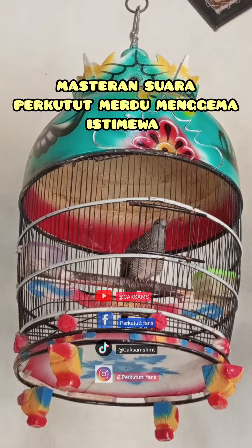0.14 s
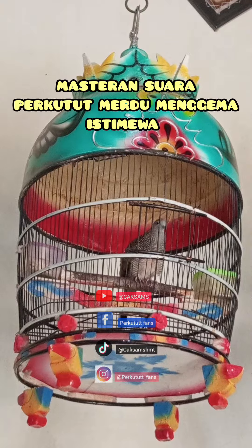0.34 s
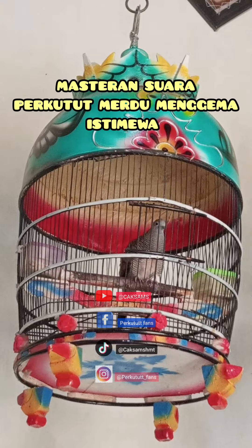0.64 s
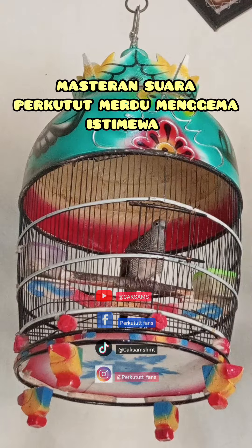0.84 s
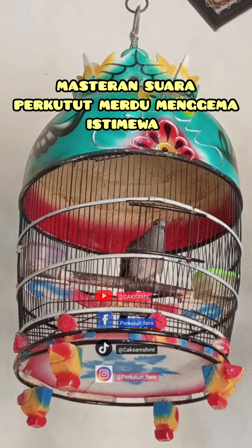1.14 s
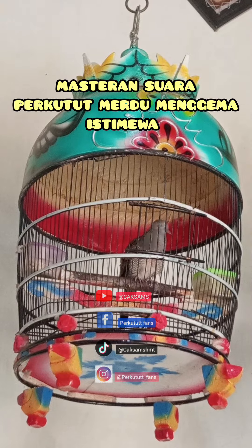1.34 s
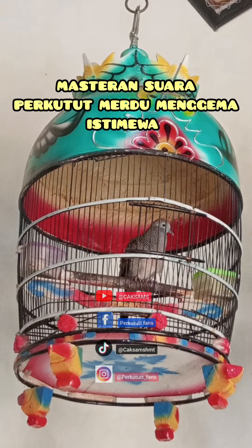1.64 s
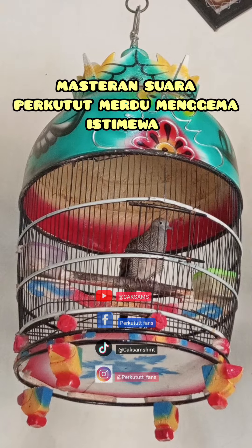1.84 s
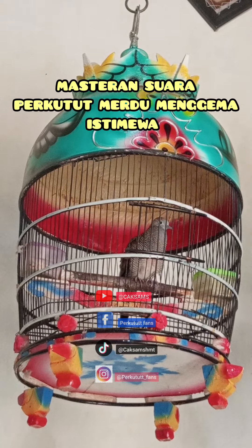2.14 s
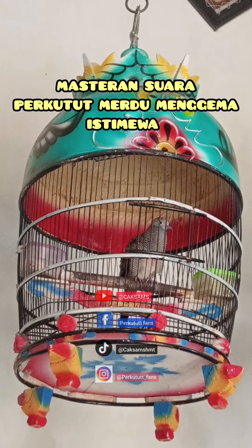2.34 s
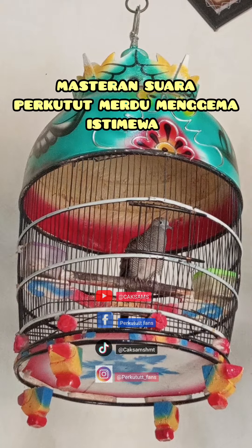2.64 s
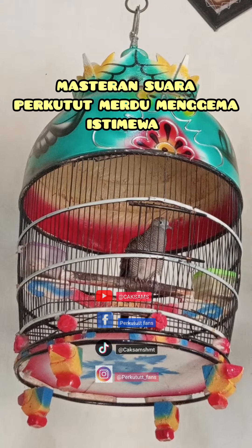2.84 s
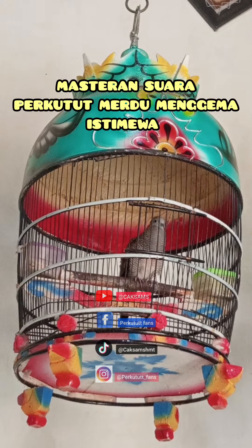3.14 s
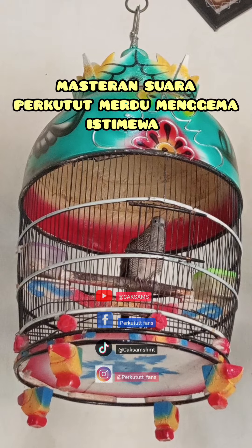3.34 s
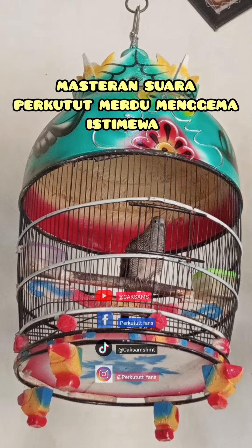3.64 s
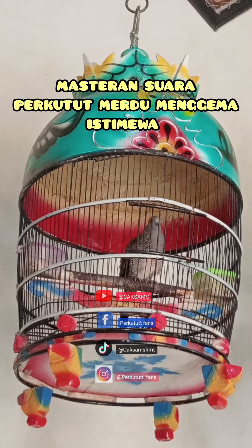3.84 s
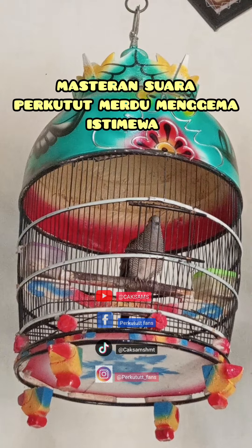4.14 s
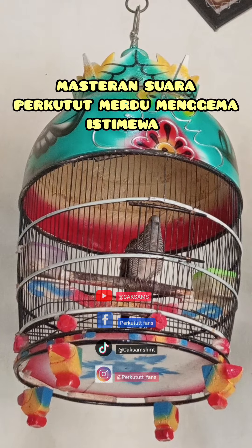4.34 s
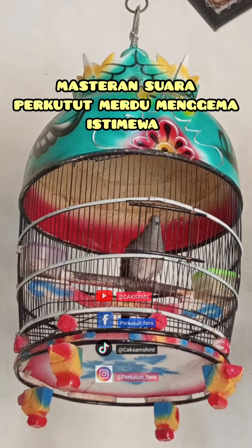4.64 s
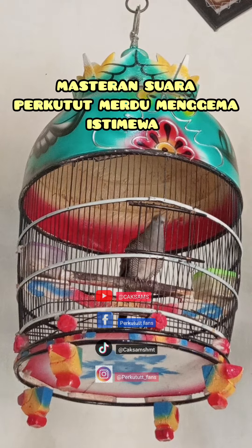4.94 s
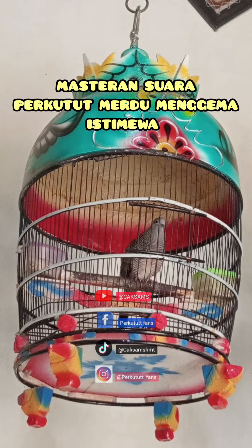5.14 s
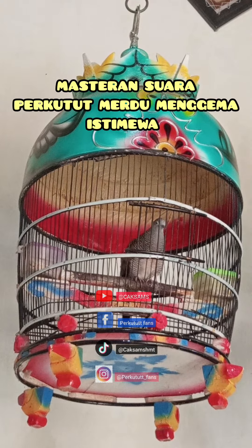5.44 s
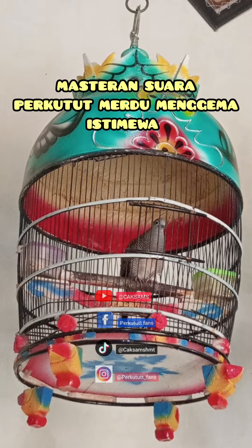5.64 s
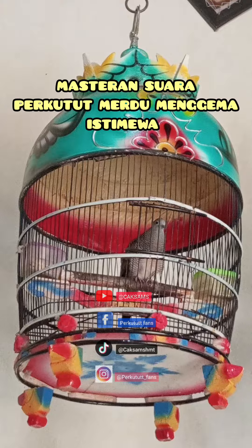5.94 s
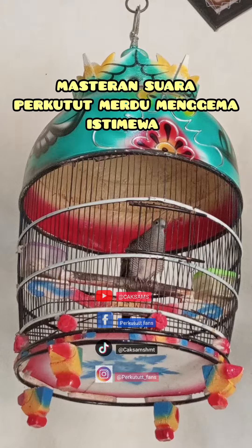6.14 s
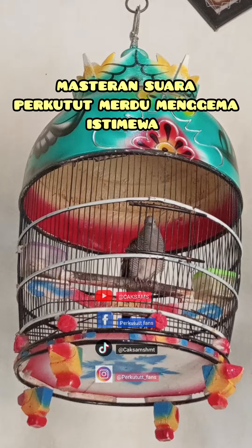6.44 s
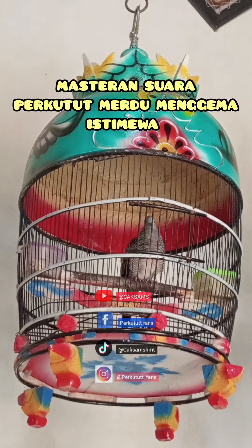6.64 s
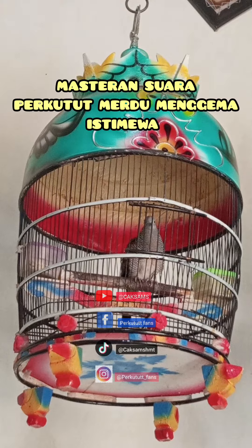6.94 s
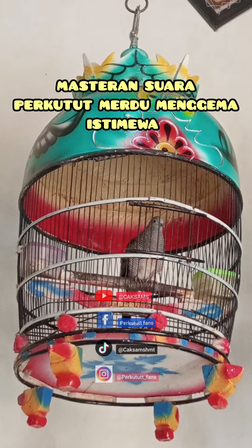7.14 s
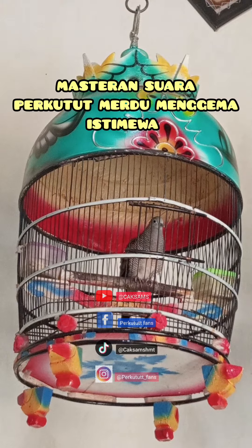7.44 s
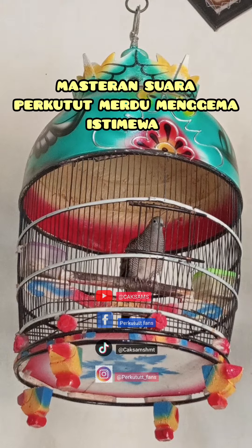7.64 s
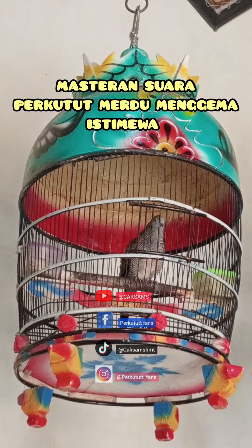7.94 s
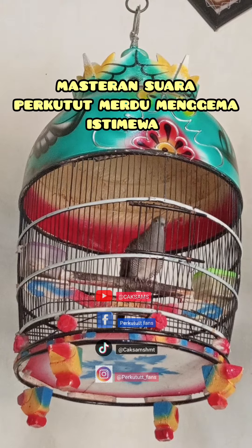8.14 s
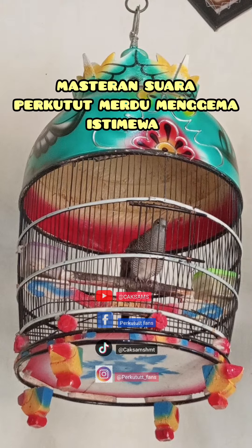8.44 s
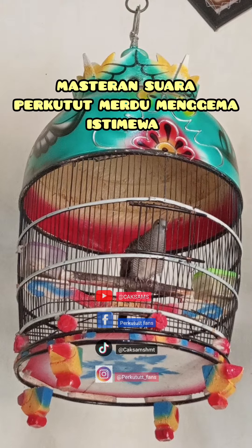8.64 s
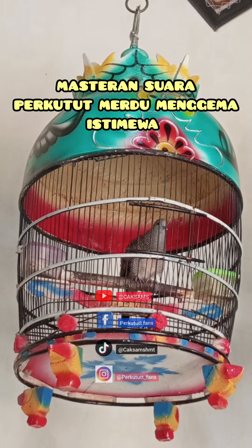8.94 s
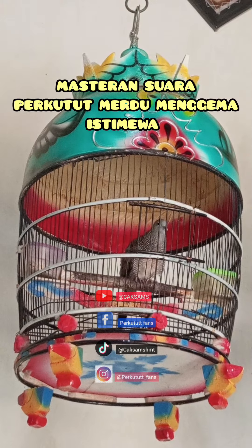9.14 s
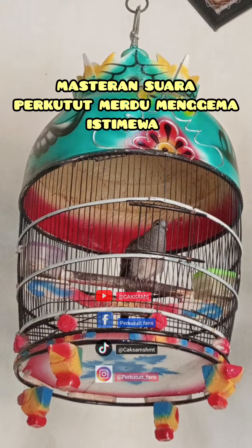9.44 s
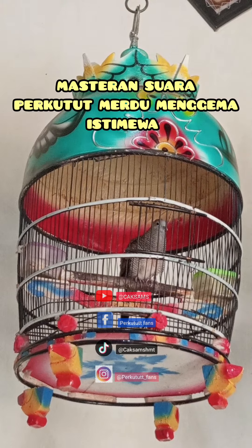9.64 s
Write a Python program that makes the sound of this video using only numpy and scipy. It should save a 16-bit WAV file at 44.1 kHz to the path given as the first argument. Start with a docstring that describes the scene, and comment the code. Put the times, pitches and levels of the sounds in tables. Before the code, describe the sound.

A caged dove sings a loud phrase of quick hoots and coos, echoing in a hard-walled room. In the pause that follows, a single sharp wooden knock sounds nearby. The dove then sings two more phrases with a gap between them. Underneath are a soft hush, a faint distant motor and tiny far-off bird chirps, and a brief rustle comes near the end.

```python
"""A caged dove coos its first phrase, and a hard-walled room answers with strong early echoes.
Under it lie the hush of the house and a distant motor that drones on, slowly losing speed.
Small birds begin to chirp far off, things bump and rustle nearby, and near 3 s a single knock
sets the modes of something wooden ringing. The dove calls again at 5 s and at 8 s;
at the end the motor surges twice and the rustling grows louder."""
import sys
import numpy as np
from scipy import signal
from scipy.fft import rfft, irfft, next_fast_len
from scipy.io import wavfile
from scipy.ndimage import uniform_filter1d, minimum_filter1d, map_coordinates

SR = 44100
rng = np.random.default_rng(int(sys.argv[2]) if len(sys.argv) > 2 else 0)


def inscribe(sig):
    """Save sig as 16-bit PCM at rate SR to the path in sys.argv[1].

    A 1-D sig is mono; a 2-D sig holds one channel per row.
    Samples are clipped to [-1, 1] before scaling.
    """
    pcm = np.round(np.clip(np.atleast_2d(sig).T, -1, 1) * 32767)
    wavfile.write(sys.argv[1], SR, pcm.astype(np.int16))


N = 430857


def amp(db):
    return 10 ** (np.asarray(db) / 20)


def unit_rms(x):
    return x / np.sqrt(np.mean(x ** 2) + 1e-20)


def along(points, hz):
    """Interpolates (Hz, value) points on a logarithmic frequency axis."""
    freqs, values = np.transpose(points)
    return np.interp(np.log(hz + 1), np.log(freqs + 1), values)


def curves(rows, count=N):
    """Interpolates each column after the time to one value per sample."""
    times, *columns = np.transpose(rows)
    return [np.interp(np.arange(count) / SR, times, column) for column in columns]


def wobble(rate):
    """Smooth random modulation with rate knots a second."""
    steps = np.arange(0, N + 64, 64)
    return np.interp(np.arange(N), steps, map_coordinates(rng.standard_normal(600), [steps * rate / SR]))


def phase_of(hz):
    """Phase is the time integral of frequency."""
    return 2 * np.pi * np.cumsum(hz) / SR


def filtered(x, response):
    """Linear filtering: the spectrum of x times a frequency response."""
    size = next_fast_len(len(x) + 8192)
    return irfft(rfft(x, size) * response(np.fft.rfftfreq(size, 1 / SR)), size)[:len(x)]


def band(x, centre_hz, octaves):
    """A Gaussian passband in log frequency, with output at unit RMS."""
    return unit_rms(filtered(x, lambda hz: np.exp(-.5 * (np.log2((hz + 1) / centre_hz) / octaves) ** 2)))


def add(track, start_s, x):
    """Superposes x on track from start_s."""
    part = track[round(start_s * SR):][:len(x)]
    part += x[:len(part)]


# Patchiness of the hush. Each row: frequency in Hz, standard deviation of the level in dB.
HUSH_SPREAD = [(100, 4), (500, 3), (1500, 1.5), (4000, 1)]
# Its spectrum. Each row: frequency in Hz, relative spectral density in dB.
HUSH_SPECTRUM = [(25, -31.5), (50, -15), (110, -1.5), (170, -6.5), (300, -9), (500, -12.5), (680, -14.5),
                 (1000, -9.5), (1300, -19.5), (2500, -20.5), (5000, -22), (6800, -20.5), (8500, -32.5),
                 (10000, -42.5), (15500, -41.5)]
# Its slow drift. Each row: time in seconds, level of the treble band in dB.
HUSH_LEVEL = [(0.0, -75), (0.76, -75.5), (0.92, -73), (2.1, -75.5), (3.83, -73), (4.22, -76), (4.95, -74),
              (5.05, -75), (5.8, -75.5), (6, -74), (8.7, -72), (9.77, -71.5)]


def hush():
    """Ambient noise of house and street: random modulation leaves the rumble lumpy, the hiss even."""
    bin_hz, _, spectra = signal.stft(rng.standard_normal(N), SR, nperseg=512)
    patches = uniform_filter1d(rng.standard_normal(spectra.shape), size=4, axis=0)
    patches = unit_rms(uniform_filter1d(patches, size=10, axis=1))
    spectra *= amp(along(HUSH_SPREAD, bin_hz)[:, None] * patches)
    noise = signal.istft(spectra, nperseg=512)[1][:N]
    noise = filtered(noise, lambda hz: amp(along(HUSH_SPECTRUM, hz)))
    treble = filtered(noise, lambda hz: (hz > 3400) & (hz < 5800))
    return amp(curves(HUSH_LEVEL)[0]) * noise / np.std(treble)


# The motor's run. Each row: time in seconds, turns per second, drone gain in dB, whine level in dB.
MOTOR_RUN = [(0, 97, -84.5, -88), (1.5, 96.9, -73.5, -85), (1.85, 96.8, -64, -82), (2.15, 96.6, -74, -74.5),
             (3, 95.5, -79, -76.5), (4.3, 90, -76.5, -88.5), (5.8, 94, -74.5, -72.5),
             (6.6, 95.2, -73.5, -54.5), (7.3, 93.3, -75, -59), (8.1, 91.6, -76, -58.5),
             (8.6, 90.8, -75, -59.5), (8.76, 90.5, -53.5, -61.5), (8.96, 90.1, -51.5, -63),
             (9.07, 89.6, -48.5, -63.5), (9.12, 89.3, -74.5, -60), (9.25, 88.5, -55.5, -56.5),
             (9.38, 87.8, -53.5, -59), (9.44, 87.4, -70, -59), (9.53, 86.9, -60, -54),
             (9.77, 85.5, -75.5, -86)]
# Harmonics of the drone. Each row: multiple of the shaft rate, relative level in dB.
SHAFT_ORDERS = [(1, -25.5), (2, -16), (3, -2), (4, -3), (5, -4), (6, -15)]


def motor():
    """Rotation radiates harmonics of the shaft rate, each wavering on its own; the tenth whines."""
    speed, drone_db, whine_db = curves(MOTOR_RUN)
    shaft = phase_of(speed * (1 + .0036 * wobble(35)))
    drone = np.zeros(N)
    for order, db in SHAFT_ORDERS:
        strength = amp(db + .8 * wobble(8.5) + 5.3 * wobble(28))
        drone += strength * np.sin(order * shaft + .77 * wobble(20) + rng.uniform(0, 2 * np.pi))
    whine = amp(whine_db + 3.5 * wobble(36)) * np.sin(10 * shaft + .64 * wobble(55))
    return np.sqrt(2) * (amp(drone_db) * drone + whine)


# Early reflections from the walls. Each row: delay in seconds, gain in dB before colouring.
WALL_ECHOES = [(0.011, -13.5), (.03, -16.5), (.047, -9.5), (0.063, -9), (.083, -15), (0.099, -14),
               (.117, -10.5)]
# Room reverberation, cut off in two steps as by a noise suppressor.
# Each row: delay in seconds, relative level in dB.
GATED_REVERB = [(0, -31.5), (.02, -6), (.105, -10), (.135, -27.5), (.3, -36), (.46, -41), (.5, -50),
                (1.5, -64.5)]
# Colour of all reflected sound. Each row: frequency in Hz, gain in dB.
ECHO_COLOUR = [(100, -3.5), (760, -5), (900, 0), (1080, 1.5), (1400, -8), (1800, -13), (2050, -3),
               (2600, -8), (7000, -12), (15000, -14)]


def room(x, reverb_db):
    """Convolution adds wall echoes and reverberation, cut off in two steps as by a noise suppressor."""
    count = 3 * SR // 2
    response = amp(reverb_db + curves(GATED_REVERB, count)[0]) * rng.standard_normal(count)
    for delay, db in WALL_ECHOES:
        response[round(delay * SR)] += amp(db)
    echoes = signal.fftconvolve(x, response)[:len(x)]
    return x + filtered(echoes, lambda hz: amp(along(ECHO_COLOUR, hz)))


# Far chirps. Each row: start in seconds, length in seconds, starting pitch in Hz, gain in dB.
BIRD_CHIRPS = [(.84, 0.097, 4640, -67), (1.23, .14, 1744, -67), (1.58, 0.117, 1821, -67),
               (1.77, .1, 1890, -69), (1.79, .17, 4390, -70), (2.41, 0.077, 4120, -59.5),
               (2.47, 0.11, 3943, -67), (2.8, 0.16, 4590, -68.5), (3.63, .1, 4416, -69.5),
               (4.21, .08, 3225, -70), (4.58, 0.11, 3225, -66.5), (4.7, 0.1, 4584, -69),
               (4.81, 0.11, 1562, -63.5), (5.861, 0.063, 2445, -69), (5.95, 0.11, 3010, -65.5),
               (5.96, .12, 2535, -72), (6.608, 0.11, 2875, -67.5), (7.331, .1, 4085, -67.5),
               (7.39, .2, 2796, -72), (7.599, 0.2, 2486, -71), (7.726, 0.16, 2770, -71.5),
               (7.218, 0.073, 2960, -73), (7.989, 0.064, 2420, -68), (9.72, .06, 3290, -63.5)]


def far_birds():
    """Thin whistles roughened by distance: random frequency modulation broadens each sagging tone."""
    out = np.zeros(N)
    sag = .0087  # share of the pitch lost along a chirp
    for start, length, start_hz, db in BIRD_CHIRPS:
        progress = np.linspace(0, 1, round(length * SR))
        hz = start_hz * (1 - sag * progress) + 400 * rng.standard_normal(SR // 2)[:len(progress)]
        envelope = np.clip(progress / .24, 0, 1) * (1 - progress) ** .5
        add(out, start, np.sqrt(2) * amp(db) * envelope * np.sin(phase_of(hz)))
    return room(out * amp(3.5 * wobble(40)), reverb_db=-33)


def noise_burst(centre_hz, octaves, rise_s, t60):
    """Grainy band-limited noise with a linear rise and an exponential decay."""
    t = np.arange(SR // 2) / SR
    noise = rng.standard_normal(len(t))
    grain_db = 2.1 * np.repeat(rng.standard_normal(len(t) // 150 + 1), 150)[:len(t)]
    envelope = np.clip(t / rise_s, 0, 1) * amp(-60 * np.maximum(t - rise_s, 0) / t60)
    return envelope * band(noise * amp(grain_db), centre_hz, octaves)


# Dull bumps. Each row: start in seconds, level in dB.
DULL_BUMPS = [(1.358, -59), (1.53, -46), (2.11, -56)]
# Hollow scuffs. Each row: start in seconds, level in dB.
HOLLOW_SCUFFS = [(2.22, -68), (2.379, -59.5), (3.79, -57.5), (3.87, -58), (3.99, -55.5), (6.36, -65),
                 (6.539, -62), (6.66, -64), (9.578, -42)]
# Rustles and, at 3.37 s, a narrow hollow ring just after the knock. Each row: start in seconds,
# centre in Hz, width in octaves, time to decay by 60 dB in seconds, level in dB.
RUSTLES_AND_RING = [(1.401, 2660, 0.41, 0.35, -59), (3.37, 625, .13, 0.53, -56.5),
                    (3.86, 5130, .46, .35, -56.5), (4.72, 700, 0.84, 0.41, -61),
                    (6.38, 5400, .39, .56, -62.5), (6.548, 5510, .46, .29, -62),
                    (6.99, 5460, 0.37, .17, -61.5), (9.354, 2660, 0.35, 0.42, -52.5),
                    (9.579, 2614, 0.8, 0.43, -49), (9.615, 2543, 0.78, 0.19, -42.5),
                    (9.605, 534, 0.39, 0.44, -42.5), (9.551, 101, .34, 0.77, -52.5),
                    (9.63, 108, .34, .9, -50)]


def small_noises():
    """Noise transients nearby: band and decay time make a bump, a scuff, a rustle or a hollow ring."""
    out = np.zeros(N)
    for start, db in DULL_BUMPS:
        add(out, start, amp(db) * noise_burst(centre_hz=134, octaves=.24, rise_s=.018, t60=.22))
    for start, db in HOLLOW_SCUFFS:
        add(out, start, amp(db) * noise_burst(centre_hz=1330, octaves=.15, rise_s=.0089, t60=.42))
    for start, centre_hz, octaves, t60, db in RUSTLES_AND_RING:
        add(out, start, amp(db) * noise_burst(centre_hz, octaves, rise_s=.013, t60=t60))
    return out


# Modes of the wood. Each row: frequency in Hz, relative level in dB, time to decay by 60 dB in seconds.
WOOD_MODES = [(473, -1.5, 0.26), (633, 2, 0.44), (1048, -17, 0.5), (1265, 0, 0.59), (1700, -23, 0.24),
              (2160, -14, 0.27), (2160, -19, 0.23), (3360, -12, 0.32), (3450, -12, 0.2)]
# The crack of the impact. Each row: frequency in Hz, relative spectral density in dB.
CRACK_SPECTRUM = [(59, -42), (100, -18), (243, -19.5), (293, -42), (394, -4), (613, -2.5), (897, -12),
                  (1230, -14), (1580, -18.5), (2270, -14.5), (8000, -31.5), (10500, -48), (15500, -50)]


def knock(start_s=3.198, gain_db=-32):
    """An impact excites the damped modes of wood, over a noisy crack that the house draws out."""
    out, t = np.zeros(N), np.arange(SR // 2) / SR
    ring = sum(amp(db - 60 * t / t60) * np.sin(phase_of(hz + rng.normal(0, 440, len(t))))
               for hz, db, t60 in WOOD_MODES)
    crack = unit_rms(filtered(rng.standard_normal(len(t)), lambda hz: amp(along(CRACK_SPECTRUM, hz))))
    crack *= amp(-60 * t / .49) * np.clip((.21 - t) / .05, .3, 1)
    attack = np.clip(t / .01, 0, 1) ** 2
    add(out, start_s, amp(gain_db) * (amp(-11.5) * ring + crack) * attack)
    return out


# Response of throat and beak. Each row: frequency in Hz, level in dB relative to the fundamental.
THROAT_RESPONSE = [(1400, -62), (1800, -39), (2200, -44), (2700, -69), (3200, -56), (3700, -73),
                   (4700, -69), (5200, -64.5), (5700, -69.5), (6250, -49.5), (6650, -59), (7100, -49.5),
                   (7600, -64), (8400, -70)]


def dove_overtones(hz, openness):
    """Source and filter: throat and beak shape the harmonics of a vibrating membrane."""
    phase = phase_of(hz)
    flicker = uniform_filter1d(rng.standard_normal((10, SR // 2)), size=700, axis=1)
    flicker = flicker[:, :len(hz)] * np.sqrt(700)
    jitter = .14 * flicker[0]  # the unsteady membrane blurs the high overtones most
    overtones = np.zeros(len(hz))
    for k in range(2, 10):
        dulling_db = .9 * k * openness  # the wide-open throat of the hoot weakens the high ones
        db = along(THROAT_RESPONSE, k * hz) + 5 * flicker[k] - dulling_db
        overtones += amp(db) * np.sin(k * phase + (k - 2) * jitter)
    pitch_slope = np.gradient(uniform_filter1d(hz, size=200))
    return overtones * np.clip(1 - pitch_slope / .45, 0, 1)  # they drop out in the fast jump upward


def breath_puff():
    """Flow noise: air breaks through the closed throat just before the hoot."""
    t = np.arange(SR // 20) / SR
    air = band(rng.standard_normal(len(t)), centre_hz=900, octaves=.4)
    return air * np.exp(-.5 * ((t - .014) / .007) ** 2)


# The dove's notes. Each row: hoot onset in seconds, hoot length in seconds, coo length in seconds,
# starting pitch of the coo in Hz, hoot level in dB, coo level in dB.
DOVE_NOTES = [(-.205, 0.021, .17, 1094, -9, -16.5), (.069, .016, 0.0055, 947, -7.5, -26),
              (.176, 0.015, 0.0038, 945, -8, -28), (.292, .018, 0.011, 1068, -9, -20),
              (.427, .016, .095, 1056, -7.5, -16.5), (.713, 0.024, .068, 1051, -7.5, -17.5),
              (5.01, .018, .17, 1105, -6.5, -15.5), (5.3, 0.02, .004, 900, -11, -24),
              (5.42, .021, 0.0026, 943, -4.5, -25.5), (5.539, 0.015, .012, 1062, -5, -19.5),
              (5.679, .016, .09, 1052, -7, -18), (8.167, .016, .205, 1105, -7, -16),
              (8.537, 0.019, .005, 925, -5, -25), (8.662, .016, .014, 1073, -6.5, -22.5),
              (8.794, .014, .095, 1054, -7, -16.5), (9.072, 0.022, .068, 1042, -8, -18)]
PREROLL_S = 1  # the dove's track begins early, since its first note starts before time zero


def dove():
    """Register breaks: a low hoot flips up into a falling coo, which drops back to a low tail."""
    out = np.zeros(N + PREROLL_S * SR)
    lead_s, swell_s, flip_s, drop_s, close_s = .029, .01, .0041, .012, .0046
    sag_hz_per_s = 472.7
    for onset, hoot_s, coo_s, coo_hz, hoot_db, coo_db in DOVE_NOTES:
        hoot_hz = 901.6 + 57 * coo_s  # a long coo has a higher hoot and a fuller tail
        tail_db = coo_db - 7.5 + 45.5 * coo_s
        fall_hz = sag_hz_per_s * coo_s
        # Each row: seconds since the previous point, pitch in Hz, level in dB.
        steps, pitches, levels = np.transpose([
            (0, .8 * hoot_hz, hoot_db - 37.5),
            (lead_s, .95 * hoot_hz, hoot_db - 17.5),
            (swell_s, .985 * hoot_hz, hoot_db),
            (hoot_s - swell_s / 2, 1.02 * hoot_hz, hoot_db - 6),
            (flip_s, coo_hz, coo_db - 2),
            (coo_s / 2, coo_hz - .25 * fall_hz, coo_db),
            (coo_s / 2, coo_hz - fall_hz, coo_db),
            (drop_s, 1.01 * hoot_hz, tail_db),
            (.18 * coo_s + .001, .98 * hoot_hz, tail_db - 2),
            (close_s, .79 * hoot_hz, tail_db - 32)])
        knots = np.cumsum(steps)
        t = np.arange(round(knots[-1] * SR)) / SR
        hz, db = np.interp(t, knots, pitches), np.interp(t, knots, levels)
        openness = np.interp(t, knots[1:5], [.3, 1, 1, 0])
        # overtones are boosted while the throat is still narrow
        pinch_db = .47 * np.clip(hoot_db - db, 0, 16) * (t < lead_s + swell_s)
        tone = np.sin(phase_of(hz)) + amp(pinch_db) * dove_overtones(hz, openness)
        envelope = uniform_filter1d(amp(db) * np.clip(t / .0052, 0, 1), size=200, mode="constant")
        start = onset + PREROLL_S - lead_s - swell_s / 2
        add(out, start, amp(hoot_db - 34.5) * breath_puff())
        add(out, start, np.sqrt(2) * envelope * tone)
    return out


def scene():
    """Superposition: the dove with its echoes and all other sources sum into one channel."""
    cooing = room(dove(), reverb_db=-33.5)[PREROLL_S * SR:]
    return (cooing + motor() + knock() + small_noises() + far_birds() + hush())[None]


def record(dry):
    """Peak limiting holds the loudest beats down, and a low-pass filter bounds the bandwidth."""
    ceiling, top_hz = .58, 15600
    needed = np.minimum(1, ceiling / (np.abs(dry[0]) + 1e-9))
    gain = uniform_filter1d(minimum_filter1d(needed, size=600), size=300)
    return filtered(gain * dry[0], lambda hz: hz < top_hz)[None]


dry = scene()
out = record(dry)
inscribe(out)
```